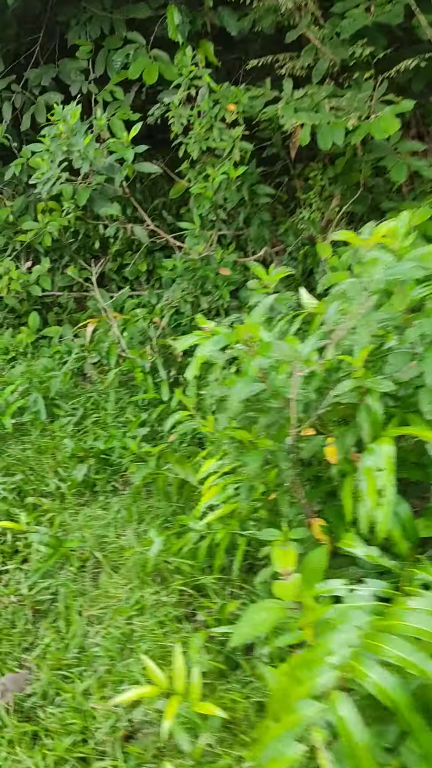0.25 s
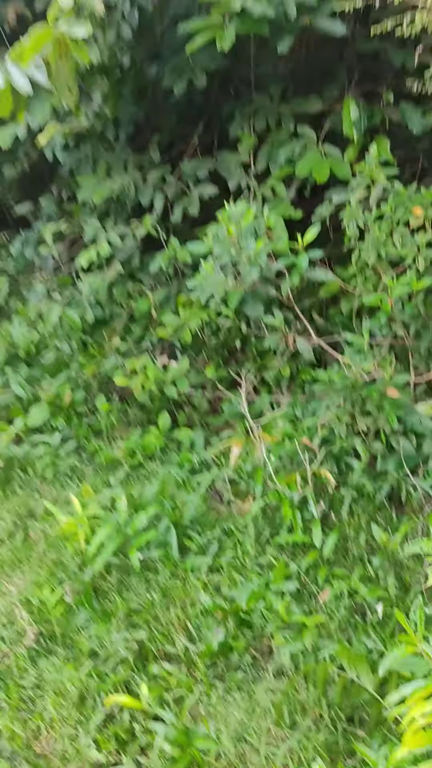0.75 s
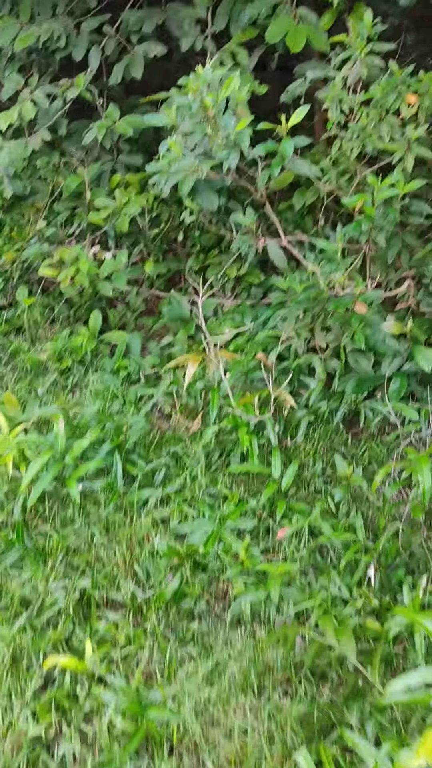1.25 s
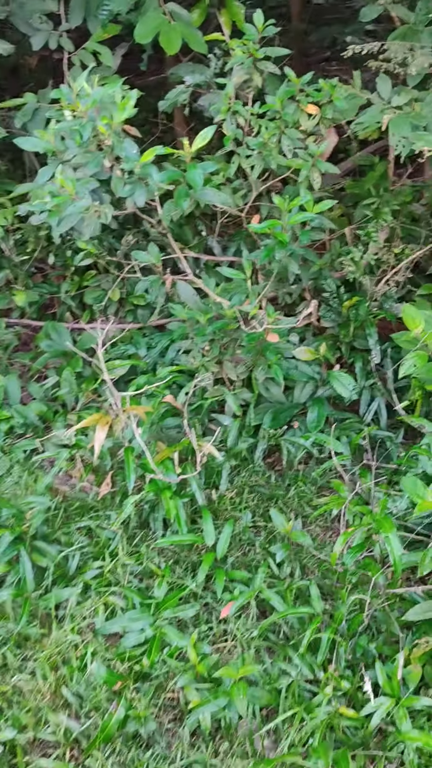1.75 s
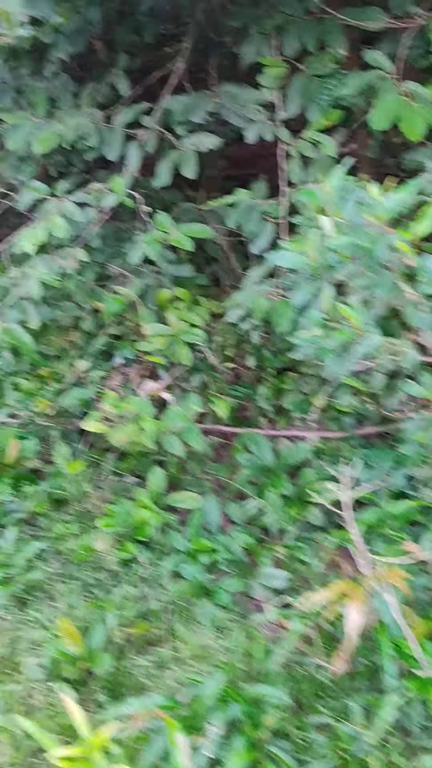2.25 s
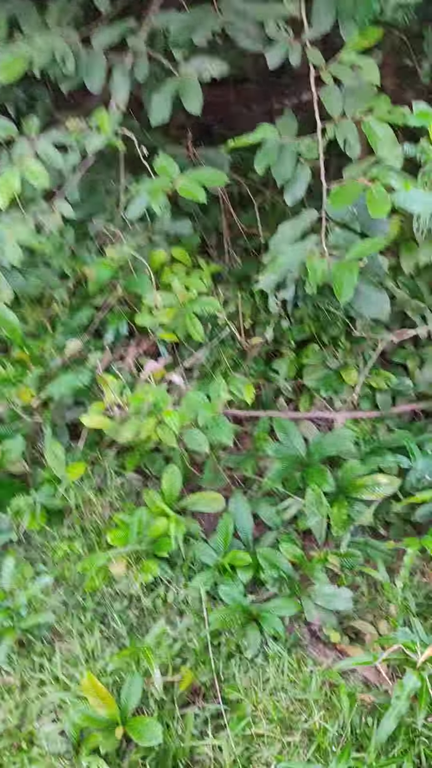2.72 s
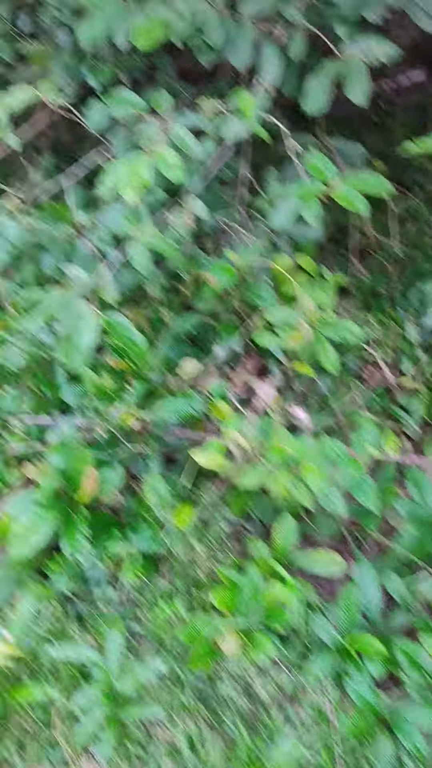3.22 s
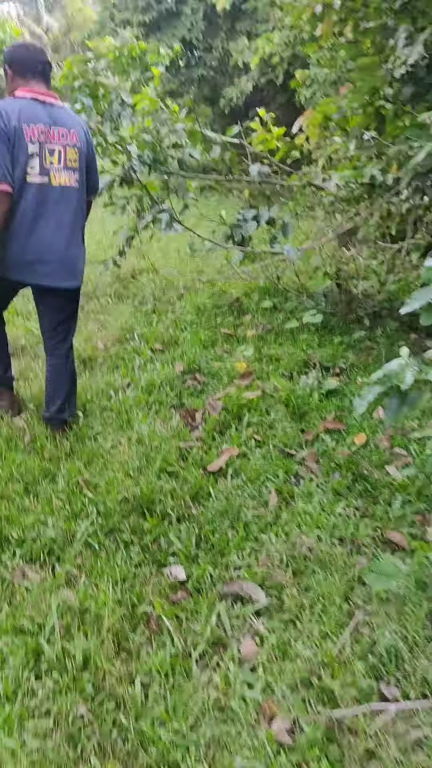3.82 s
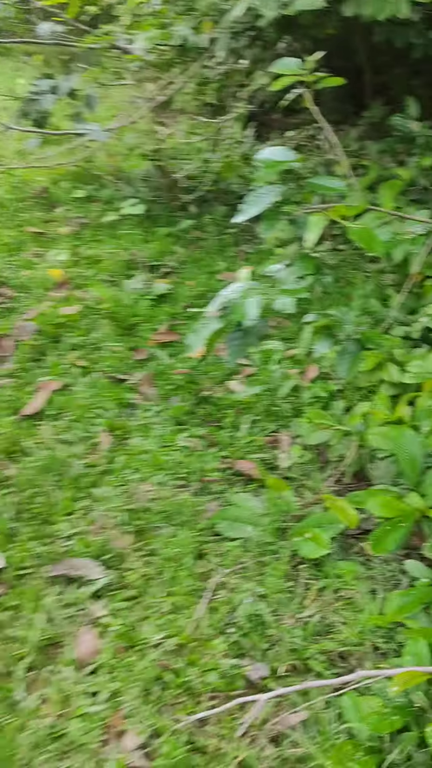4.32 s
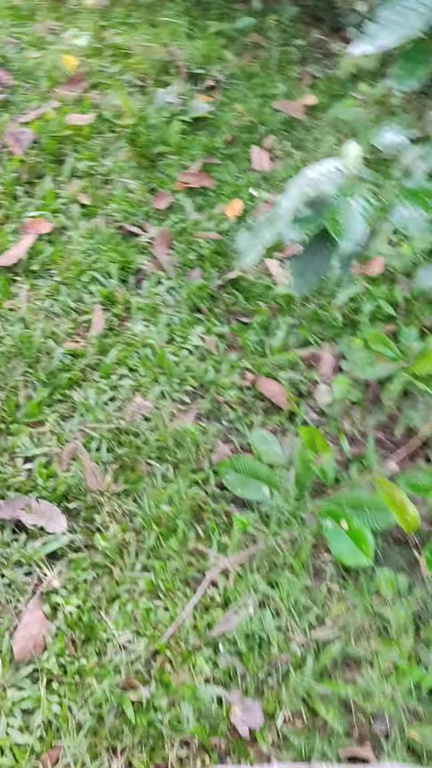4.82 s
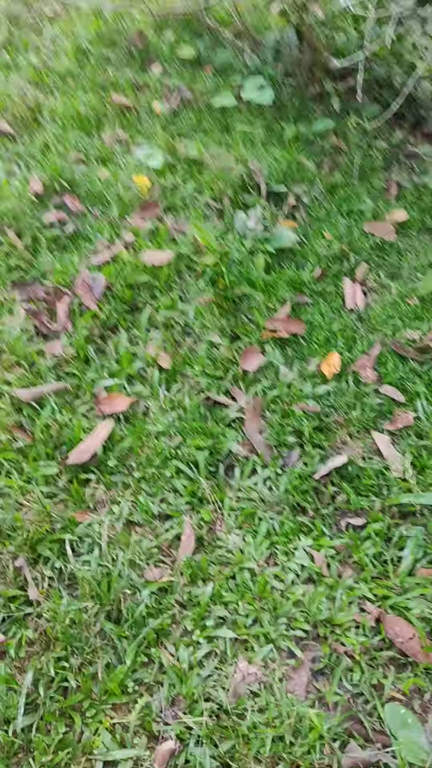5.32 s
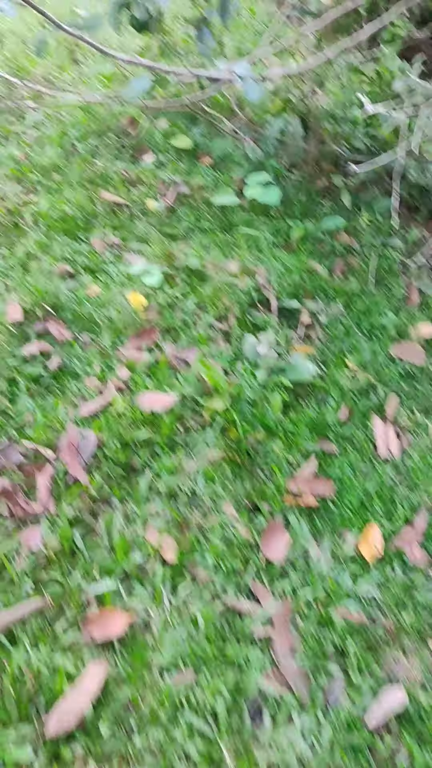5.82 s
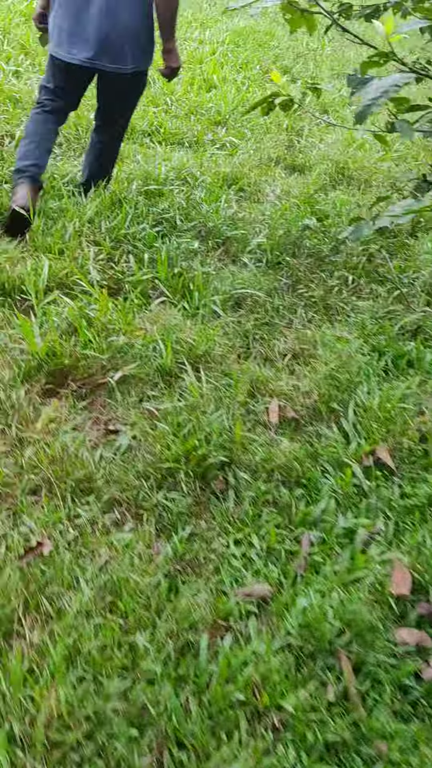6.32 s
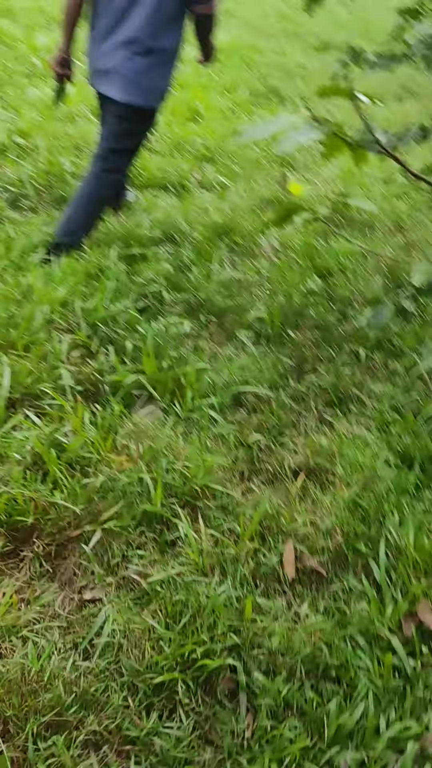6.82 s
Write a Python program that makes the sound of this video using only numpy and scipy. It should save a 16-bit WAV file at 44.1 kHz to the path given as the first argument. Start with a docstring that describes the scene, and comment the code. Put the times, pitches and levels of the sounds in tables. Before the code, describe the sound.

Someone walks through grassy undergrowth: crackly rustling, a loud burst of dragging foliage, then sparse twig cracks over a constant shrill insect buzz.

```python
"""Grass and scrub: someone walks through holding a phone, legs swishing the blades, amid twig snaps,
a soft footfall and a low tap. The swish, and a leafy branch dragged across the left microphone port,
are crackles of tiny clicks and noise. Snaps and knocks ring a few short modes, dry leaves tick as
noise bursts, and wind puffs as lumpy low noise. Behind lie insect choirs of resonant clicks, a wash of
distant foliage and one faint bird whistle. Each port is a small cavity that rings near 8 kHz."""
import sys
import numpy as np
from scipy import signal
from scipy.fft import rfft, irfft, next_fast_len
from scipy.io import wavfile
from scipy.ndimage import uniform_filter1d

SR = 44100
rng = np.random.default_rng(int(sys.argv[2]) if len(sys.argv) > 2 else 0)


def unload_audio(sound):
    """Save the sound as a 16-bit wav file, at the path given as the first command line argument."""
    columns = np.transpose(np.atleast_2d(sound))
    # keep every value between -1 and 1, then stretch to whole-number steps
    steps = np.round(np.clip(columns, -1, 1) * 32767)
    wavfile.write(sys.argv[1], SR, steps.astype(np.int16))


def volts(x):
    """Linear amplitude factor 10**(x/20) for a level x in dB, scalar or array-like."""
    e = np.asarray(x, float) / 20
    return 10 ** e


N = 311346  # samples
GROUND_LAG = 15  # samples by which the right port hears shared sounds later

# Legs brushing through grass: peak_s, level_db (600-3500 Hz), rise_s, fall_s,
# fizz_above_db (8300-9500 Hz, relative to level_db)
LEG_STROKES = [(0.0, -31, 0.05, 0.075, -11), (0.167, -38.5, 0.67, 0.11, 4),
               (0.345, -41.5, 0.12, 0.031, 6.5), (0.518, -47, 0.97, 0.25, 5.5),
               (0.707, -43.5, 0.076, 0.24, 4.5), (1.29, -51.5, 0.45, 0.028, 7),
               (1.445, -49.5, 0.24, 0.27, 5.5), (1.666, -52, 0.06, 0.29, 1), (1.931, -47.5, 0.15, 1, -1.5),
               (2.174, -39, 0.043, 0.031, -0.5), (2.325, -40, 0.29, 0.44, -2), (2.42, -32, 0.041, 0.2, -5),
               (2.66, -31.5, 0.064, 0.049, -23), (2.803, -37, 0.15, 0.061, 1.5),
               (2.94, -37.0, 0.069, 0.11, 5), (3.075, -44.5, 0.44, 0.18, 1),
               (3.284, -49, 0.044, 0.77, -0.5), (3.686, -48.0, 0.73, 0.12, 4.5),
               (3.884, -51.5, 0.082, 1, 2.5), (4.272, -52, 0.12, 0.16, 4.5),
               (4.494, -43.5, 0.12, 0.34, 2.5), (4.751, -47.5, 0.12, 0.34, -0.5),
               (5.13, -56.5, 0.015, 0.5, 2), (5.33, -56, 0.23, 0.96, 6), (5.7, -51.5, 0.07, 1, -4),
               (5.838, -38.5, 0.055, 0.14, 3), (6.0, -46, 0.034, 0.12, 4), (6.467, -51.5, 0.1, 0.62, 3),
               (6.87, -54.5, 0.073, 0.68, 4), (6.97, -46.5, 0.061, 0.071, 5.5)]
# Leaves scraping the left port: peak_s, level_db (600-3500 Hz), fall_s,
# thump_above_db (150-600 Hz), fizz_above_db (8300-9500 Hz), both relative to level_db
LEAF_SCRAPES = [(.012, -31, 0.032, 5, 9.5), (0.054, -38.5, 0.08, 3, 3), (2.395, -21.5, 0.025, -19, -4),
                (2.411, -15.5, 0.023, 2, 1), (2.428, -25.5, 0.034, 7, 5), (2.441, -21, 0.028, 4, 3),
                (2.46, -21.5, .02, -13, 6), (2.482, -28, 0.034, 7, -1), (2.5, -19, 0.019, -2.5, -3),
                (2.517, -33, 0.017, 7, -12), (2.534, -23.5, 0.037, -12, -1.5),
                (2.56, -24.5, 0.014, -4, 3.5), (2.583, -36, 0.024, -3, -9), (2.6, -29, .04, -8, 4),
                (2.626, -19.5, 0.039, -5, 4), (2.643, -20, .04, -1.5, 0), (2.662, -23, 0.031, -7, -3),
                (2.678, -20.5, .015, -15, 7.5)]
# Twig snaps, a soft footfall (5.13 s) and a low tap (6.16 s):
# start_s, nominal level_db, nominal pitch_hz, t60_s, left_over_right_db
KNOCKS_AND_SNAPS = [(5.128, -37.5, 805, 0.047, 13), (5.147, -42.5, 735, 0.026, 11),
                    (5.29, -24.5, 1760, 0.025, 7), (5.383, -24, 1650, 0.032, 16),
                    (5.388, -21, 1750, 0.027, 8), (5.393, -25, 1764, 0.076, 6),
                    (6.163, -42.5, 310, 0.06, 10), (6.636, -22.5, 1808, 0.064, 23),
                    (6.641, -25.5, 1620, 0.05, 7)]
# Dry leaves ticking: start_s, relative level_db, left_over_right_db (both ahead of the port colour)
LEAF_TICKS = [(0.192, -9, 34), (0.3313, -13, 4), (1.167, -23, 8), (1.4187, -30, 5.0), (2.151, -22, -1),
              (2.391, -5, 17), (2.583, -5.5, 22), (2.62, -7, 24), (2.6788, -15, 11), (3.285, -26, -9),
              (4.399, -18, -7), (4.6625, -19, 14), (5.9329, -10.5, 17), (6.4695, -20, 4)]
# Puffs of wind: peak_s, level_db (25-140 Hz), rise_s, fall_s
WIND_PUFFS = [(.04, -43.5, .15, 0.087), (.17, -51, 0.11, 0.11), (1.31, -63, 0.4, 0.27),
              (2.44, -33.5, 0.046, 0.15), (2.53, -57, .1, .15), (2.688, -35.5, 0.16, 0.04),
              (2.83, -57, 0.18, .2), (3.11, -72, 0.063, 0.089), (3.61, -63, 0.091, .15),
              (3.77, -63, .1, .3), (3.95, -60, .2, .2), (4.198, -50.5, 0.11, .15), (4.8, -44, 0.05, 0.12),
              (5.15, -61, .1, 0.22), (6.09, -55, 0.14, 0.14), (6.35, -56, 0.038, 0.18), (6.59, -61, .1, .1),
              (6.74, -59, 0.08, 0.11)]
# Insect choirs: pitch_hz, nominal width_hz, left_db, right_db, clicks_per_s
INSECT_CHOIRS = [(4744, 390, -59.5, -56, 810), (6490, 220, -60.5, -50.5, 1800),
                 (7790, 820, -38.5, -37, 1500), (9920, 1260, -56.5, -61.5, 2600)]
# Level of the distant foliage at 150-3500 Hz: left_db, right_db
FOLIAGE_LEVELS = (-55.5, -66.5)

# Colour of each microphone port, left then right: frequency_hz, gain_db
PORT_COLOURS = [
    [(20, -3.5), (4000, -5), (5500, 1.5), (7000, 5.5), (8000, 8), (8700, 13.5), (9200, 10), (9700, -5.5),
     (11000, -9), (14000, -8.5), (16000, -14)],
    [(20, 16.5), (4000, 14), (5500, -2), (6700, 12), (7700, 20), (8300, 15.5), (9200, -5), (9800, -18),
     (11000, -49), (14000, -12.5), (16000, -12)],
]
# Dull body of sliding blades and leaves: frequency_hz, gain_db
BODY_COLOUR = [(40, -75), (150, -7.5), (400, -5.5), (1300, 1.5), (2500, 0.5), (4000, -5.5), (7000, -17.5),
               (12000, -58)]
# Bright fizz of blades and dry leaves: frequency_hz, gain_db
FIZZ_COLOUR = [(1000, -22), (3000, -25), (5500, 0), (9000, 3.5), (16000, 0)]
# Thump of leaves on the port: frequency_hz, gain_db
THUMP_COLOUR = [(20, -45), (100, -3), (200, 5.5), (400, 0.5), (900, -8.5), (3000, -84)]
# Low rumble of wind on the ports: frequency_hz, gain_db
WIND_COLOUR = [(15, 5), (40, -1.5), (90, -5), (200, -16.5), (600, -33)]
# Wash of distant foliage: frequency_hz, gain_db
FOLIAGE_COLOUR = [(20, -45), (150, 6), (400, 8), (1000, 1.5), (3000, -25), (6000, -18), (16000, -13)]


def swish():
    """Blades slide and flick: dull body and bright fizz from the same crackle."""
    peak_s, level_db, rise_s, fall_s, fizz_above_db = np.transpose(LEG_STROKES)
    # The rest levels are blades that never quite settle.
    body_db = swells(peak_s, level_db, rise_s, fall_s, rest_db=-72.5)
    fizz_db = swells(peak_s, level_db + fizz_above_db, rise_s, fall_s, rest_db=-55.5)

    drive = crackle(per_s=2500, spread_db=2.0, clump_db=1.5, smooth=1.37)
    drive = patchy(drive, depth_db=3)  # the colour drifts from leaf to leaf
    body = heard(near(drive, same=0.55), BODY_COLOUR, (600, 3500))
    fizz = heard(drive, FIZZ_COLOUR, (8300, 9500))

    # Louder body sits further left; louder fizz sits very slightly less so.
    body_pan_db = 12.5 + 0.21 * (body_db + 52)
    fizz_pan_db = 11.5 - 0.03 * (fizz_db + 55.5)
    return sides(body_db, body_pan_db) * body + sides(fizz_db, fizz_pan_db) * fizz


def drag():
    """Stick-slip of leaves right on the left port: coarse clicks that thump the membrane."""
    right_leak_db = -44  # what the right port hears of it
    peak_s, level_db, fall_s, thump_above_db, fizz_above_db = np.transpose(LEAF_SCRAPES)
    rise_s = 0.44 * fall_s
    drive = crackle(per_s=3500, spread_db=0.5, clump_db=2.5, smooth=0.5)
    layers = [(0, BODY_COLOUR, (600, 3500)),
              (thump_above_db, THUMP_COLOUR, (150, 600)),
              (fizz_above_db, FIZZ_COLOUR, (8300, 9500))]
    out = np.zeros((2, N))
    for above_db, points, band in layers:
        envelope = volts(swells(peak_s, level_db + above_db, rise_s, fall_s))
        out += envelope * heard(drive, points, band)
    return out * volts(np.array([[0], [right_leak_db]]))


def knocks_and_snaps():
    """Twig snaps, a soft footfall and a low tap: each rings a few short modes around its pitch."""
    roughness, attack_s = 0.47, 0.00034  # roughness breaks up the ring
    mode_ratios = np.array([0.2, 0.55, 0.8, 1, 1.15, 1.35])
    mode_gains = volts(np.array([-13.5, -7.5, 1.0, 0.5, 0, -4]))[:, None]
    out, t = np.zeros((2, N + 8000)), np.arange(4000) / SR
    flutters = rng.standard_normal((len(KNOCKS_AND_SNAPS), len(t)))
    flutters = evened(uniform_filter1d(flutters, size=120))
    chance = rng.random((len(KNOCKS_AND_SNAPS), 2, 6))

    for hit, (phase, detune), flutter in zip(KNOCKS_AND_SNAPS, chance, flutters):
        start_s, level_db, pitch_hz, t60_s, pan_db = hit
        modes_hz = (pitch_hz * mode_ratios * (0.887 + 0.151 * detune))[:, None]
        modes = np.sin(2 * np.pi * (modes_hz * t + phase[:, None]))
        ring = (mode_gains * modes).sum(0) * volts(-60 * t / t60_s)
        ring *= 1 + roughness * flutter
        ring *= np.minimum(t / attack_s, 1) / abs(ring).max()
        left, right = sides(np.array(level_db), np.array(pan_db))
        at = round(start_s * SR)
        out[0, at:at + len(t)] += left * ring
        out[1, at + GROUND_LAG:at + GROUND_LAG + len(t)] += right * ring
    return out[:, :N]


def ticks():
    """Each tick of a dry leaf is a burst of noise, some 2 ms long, that rings the ports."""
    drive, t = np.zeros((2, N + 400)), np.arange(200) / SR
    envelope = t / 0.00086 * np.exp(1 - t / 0.00045)
    bursts = rng.standard_normal((len(LEAF_TICKS), 2, 200)) * envelope
    for (start_s, level_db, pan_db), burst in zip(LEAF_TICKS, bursts):
        at = round(start_s * SR)
        gains = sides(np.array(level_db), np.array(pan_db))
        drive[:, at:at + len(t)] += gains[:, None] * burst
    rung = [colour(colour(side[:N], FIZZ_COLOUR), port) for side, port in zip(drive, PORT_COLOURS)]
    return volts(-10.5) * np.array(rung)


def wind():
    """Lumpy low pressure, unrelated on the two ports; puffs hit the left one harder."""
    lumps = evened(uniform_filter1d(rng.standard_normal((2, N)), size=1500))
    drive = volts(2.8 * lumps) * rng.standard_normal((2, N))
    level_db = swells(*np.transpose(WIND_PUFFS), rest_db=-64.5)  # a breeze between puffs
    pan_db = 20.5 + 0.76 * (level_db + 50)
    return sides(level_db, pan_db) * heard(drive, WIND_COLOUR, (25, 140))


def insects():
    """Many unsynchronised clickers, each choir ringing one steep body resonance."""
    out, t = np.zeros((2, N)), np.arange(N) / SR
    for pitch_hz, width_hz, left_db, right_db, clicks_per_s in INSECT_CHOIRS:
        click_mask = rng.random((2, N)) < clicks_per_s / SR
        clicks = rng.standard_normal((2, N)) * (click_mask + 0.22)  # clicks over a little hiss
        # Shift the pitch to 0 Hz, smooth with three equal poles, shift back.
        pole = np.exp(-np.pi * width_hz * 1.5 / SR)
        carrier = np.exp(2j * np.pi * pitch_hz * t)
        ring = signal.lfilter([1], np.poly([pole, pole, pole]), clicks / carrier) * carrier
        waver_db = 1.0 * evened(uniform_filter1d(rng.standard_normal(N), size=6000))
        out += volts(np.array([[left_db], [right_db]])) * evened(ring.real * volts(waver_db))
    return out


def air():
    """The faint wash of distant foliage: steady noise, mostly shared by the two ports."""
    wash = near(rng.standard_normal((2, N)), same=0.91)
    return volts(np.array(FOLIAGE_LEVELS))[:, None] * heard(wash, FOLIAGE_COLOUR, (150, 3500))


def bird():
    """A faint blurred whistle far off: a narrow band of noise that swells once."""
    pitch_hz, pole_width_hz = 3870, 200
    carrier = np.exp(2j * np.pi * pitch_hz * np.arange(N) / SR)
    pole = np.exp(-np.pi * pole_width_hz / SR)
    noise = rng.standard_normal((2, N))
    ring = signal.lfilter([1], np.poly([pole, pole]), noise / carrier) * carrier
    envelope = volts(swells(peak_s=6.165, level_db=-49, rise_s=0.17, fall_s=0.13))
    return evened(ring.real) * envelope * volts(np.array([[0], [-7]]))  # right 7 dB softer


def crackle(per_s, spread_db, clump_db, smooth):
    """Clumped clicks of uneven size over a share of smooth noise, both sides."""
    clumps = volts(clump_db * evened(uniform_filter1d(rng.standard_normal(N), size=300)))
    size = volts(spread_db * np.minimum(rng.exponential(1, (2, N)), 4))
    size = size * rng.standard_normal((2, N))
    clicks = evened(size * (rng.random((2, N)) < per_s / SR))
    return clumps * (clicks + smooth * rng.standard_normal((2, N)))


def patchy(x, depth_db):
    """Random patches of some 60 ms by 600 Hz, louder or softer."""
    spectrum = signal.stft(x, nperseg=512)[2]
    field = rng.standard_normal(spectrum.shape[1:])
    field = uniform_filter1d(field, size=7, axis=0)  # across frequency
    field = uniform_filter1d(field, size=10, axis=1)  # across time
    gains = volts(depth_db * field / field.std())
    return evened(signal.istft(spectrum * gains, nperseg=512)[1][:, :N])


def swells(peak_s, level_db, rise_s, fall_s, rest_db=-120):
    """Level in dB of overlapping swells, each 20 dB down one rise before and one fall after its peak."""
    hop = 32  # samples
    roundness = 1.54  # 1 = pointed swell, 2 = bell
    late_s = np.arange(0, N + hop, hop)[:, None] / SR - peak_s
    span_s = np.clip(np.where(late_s < 0, rise_s, fall_s), 0.002, None)
    down_db = 20 * (abs(late_s) / span_s) ** roundness
    power = (volts(level_db - np.minimum(down_db, 200)) ** 2).sum(1) + volts(rest_db) ** 2
    return np.interp(np.arange(N) / hop, np.arange(len(power)), 10 * np.log10(power))


def near(x, same):
    """The right side shares part of the left, a little later."""
    same = np.clip(same, 0, 1)
    right = same * np.roll(x[0], GROUND_LAG) + np.sqrt(1 - same ** 2) * x[1]
    return np.array([x[0], right])


def sides(level_db, pan_db):
    """Left and right gains of two unrelated signals whose mean has level_db."""
    right = volts(-pan_db)
    return 2 * volts(level_db) / np.sqrt(1 + right ** 2) * np.array([np.ones_like(right), right])


def heard(x, points, band):
    """Colours a pair by its source and the ports; rms 1 within band (Hz) on each side."""
    y = np.array([colour(colour(side, points), port) for side, port in zip(x, PORT_COLOURS)])
    power, hz = abs(rfft(y)) ** 2, np.fft.rfftfreq(N, 1 / SR)
    inside = power[:, (hz > band[0]) & (hz < band[1])].sum(1)
    return evened(y) * np.sqrt(power.sum(1) / inside)[:, None]


def colour(x, points):
    """Filters by a spectrum given as (Hz, dB), joined along log frequency."""
    size = next_fast_len(N + 4096)
    point_hz, point_db = np.transpose(points)
    hz = np.fft.rfftfreq(size, 1 / SR)
    gain_db = np.interp(np.log(hz + 1), np.log(point_hz + 1), point_db)
    return irfft(rfft(x, size) * volts(gain_db), size)[..., :N]


def evened(x):
    """Scales each row to rms 1."""
    return x / np.sqrt(np.mean(x ** 2, axis=-1, keepdims=True) + 1e-20)


def scene():
    """All sources at the two ports."""
    return swish() + drag() + knocks_and_snaps() + ticks() + wind() + insects() + air() + bird()


def low_pass(x):
    """Removes everything above the highest recorded frequency."""
    return signal.sosfilt(signal.butter(12, 15800, fs=SR, output="sos"), x)


def record(dry):
    """The phone's converter clips at full scale."""
    mix = np.clip(dry, -1, 1)
    return low_pass(mix)


dry = scene()
out = record(dry)
unload_audio(out)
```